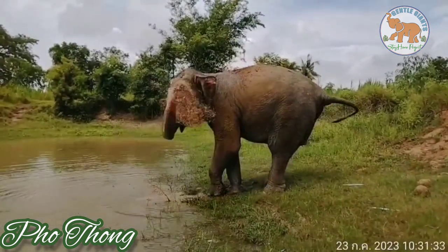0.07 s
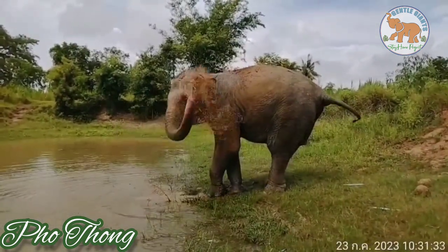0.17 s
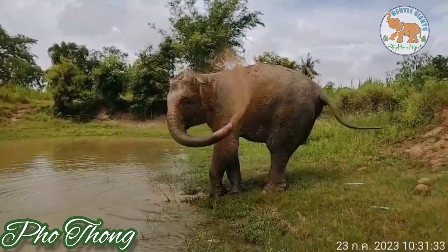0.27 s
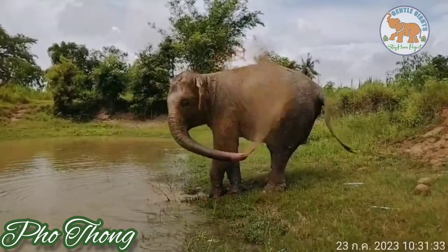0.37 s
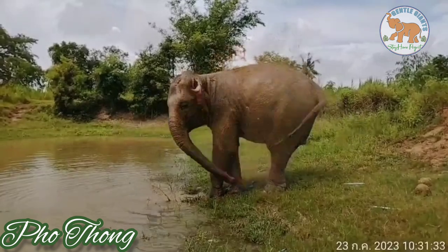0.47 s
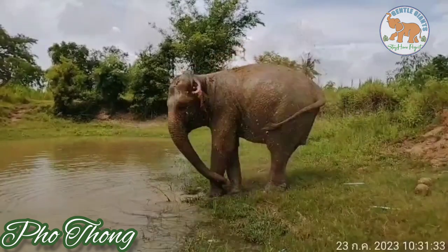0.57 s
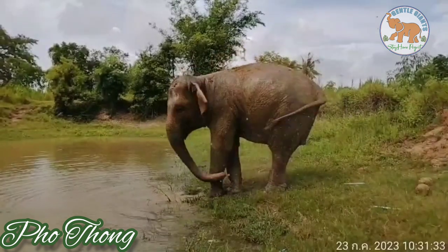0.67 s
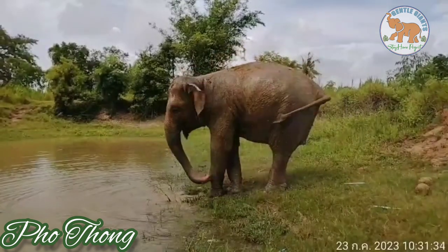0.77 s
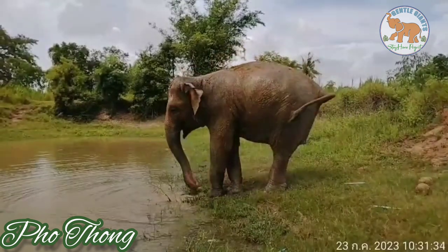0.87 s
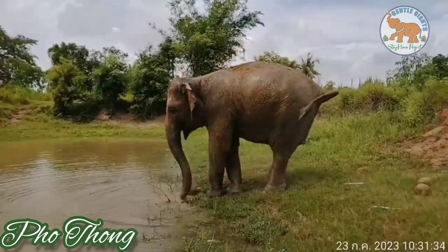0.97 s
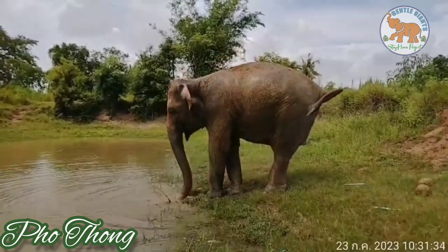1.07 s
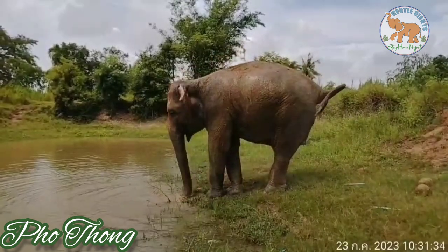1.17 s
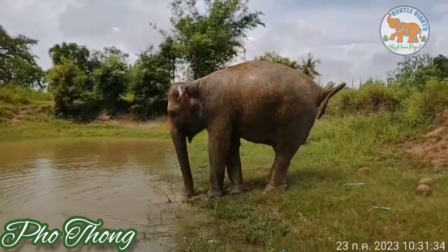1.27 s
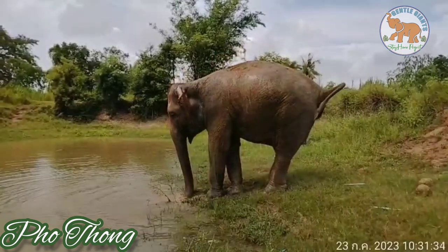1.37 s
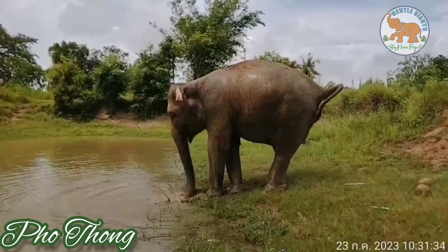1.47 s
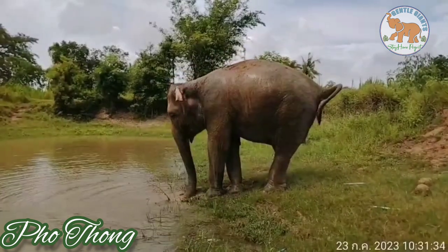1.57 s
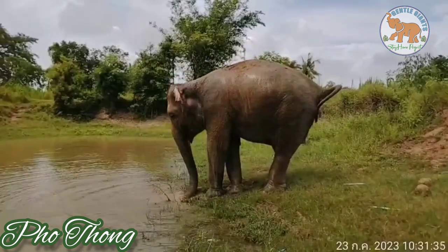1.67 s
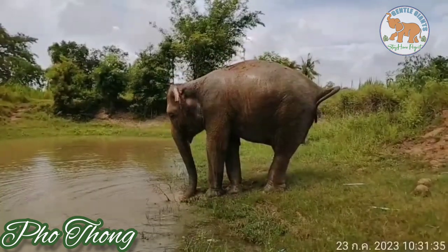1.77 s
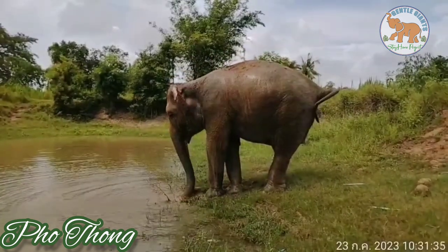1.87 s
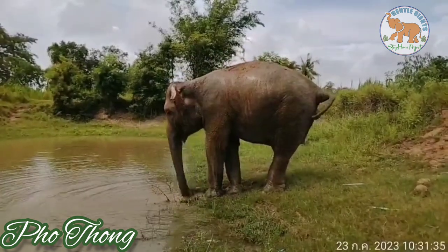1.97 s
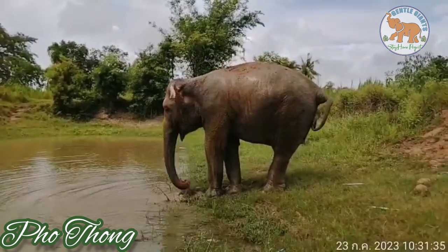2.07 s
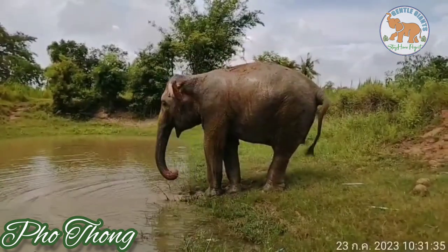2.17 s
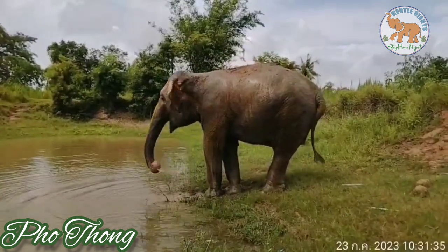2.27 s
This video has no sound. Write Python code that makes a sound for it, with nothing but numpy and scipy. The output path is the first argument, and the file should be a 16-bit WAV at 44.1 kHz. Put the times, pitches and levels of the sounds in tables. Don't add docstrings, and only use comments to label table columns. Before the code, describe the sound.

A trunkful of water sloshes and sprays brightly, slaps an elephant's flank, patters on hide and grass, then dribbles out and stirs slightly; quiet open pond edge, distant bird, light breeze on the microphone.

```python
import sys
import numpy as np
from scipy import signal
from scipy.fft import rfft, irfft
from scipy.io import wavfile

SR = 44100
rng = np.random.default_rng(int(sys.argv[2]) if len(sys.argv) > 2 else 0)


def boost_factor(decibels):
    exponent = np.asarray(decibels, float) / 20
    return 10 ** exponent


def transcribe(signal):
    frames = np.atleast_2d(signal).T
    limited = np.clip(frames, -1, 1)
    pcm = np.round(limited * 32767).astype(np.int16)
    wavfile.write(sys.argv[1], SR, pcm)


N = 101430


def rms_one(x):
    return x / np.sqrt(np.mean(x ** 2) + 1e-20)


def in_time(rows):
    s, *columns = np.transpose(rows)
    return [np.interp(np.arange(N) / SR, s, c) for c in columns]


def drift(rate):
    r = np.exp(-40 * np.pi * rate / SR)
    slow = signal.lfilter([1], [1, -2 * r, r * r], rng.standard_normal(N // 20 + 2002))
    slow = rms_one(slow[2000:])
    return np.interp(np.arange(N) / 20, np.arange(len(slow)), slow)


def band(x, low_hz, high_hz):
    return signal.sosfilt(signal.butter(2, [low_hz, high_hz], "band", fs=SR, output="sos"), x)


def ring(clicks, hz, t60_s):
    r = boost_factor(-60 / (t60_s * SR))
    w = 2 * np.pi * hz / SR
    return signal.lfilter([0, np.sin(w)], [1, -2 * r * np.cos(w), r * r], clicks + 1e-18)


def coloured(excite, spectrum, patchy_db):
    hz, db = np.transpose(spectrum)
    edges_hz = 100 * 2 ** np.arange(0, 7.5, 1 / 5)
    out, shared = 0, drift(8.0)
    for k, (low_hz, high_hz) in enumerate(zip(edges_hz, edges_hz[1:])):
        centre_hz = np.sqrt(low_hz * high_hz)
        if hz[0] / 1.2 < centre_hz < hz[-1] * 1.2:
            level_db = np.interp(np.log(centre_hz), np.log(hz), db)
            flicker_db = patchy_db * (.3 * shared + drift(22))
            out = out + band(excite[k % 2], low_hz, high_hz) * boost_factor(level_db + flicker_db)
    return out / np.sqrt(np.mean(out[0] ** 2))


def open_air():
    # frequency in Hz, level in dB per Hz.
    air = [(120, 6), (300, 0), (1000, -49.5), (2200, 2), (3800, -13), (5500, 11.5), (8000, -3), (14000, 0)]
    return boost_factor(-76) * coloured(rng.standard_normal((2, 2, N)), air, patchy_db=1.0)


def breeze():
    # time in seconds, level in dB.
    gusts = [(0.0, -70), (0.15, -73.5), (0.23, -59), (0.31, -61), (0.35, -55), (0.38, -62), (0.61, -65),
             (0.645, -53), (0.71, -68), (0.8, -65), (0.92, -70), (1.13, -64), (1.22, -71), (1.27, -63),
             (1.31, -70), (1.36, -64), (1.65, -77.5), (2.3, -77)]
    level_db, = in_time(gusts)
    rumble = rms_one(band(rng.standard_normal(N), 20.5, 85))
    return boost_factor(level_db + 1.3 * drift(5.6)) * rumble


def bird():
    # start in seconds, length in seconds, start pitch in Hz, end pitch in Hz, level in dB.
    notes_sung = [
        (.605, .13, 1320, 1360, -65),
        (.72, .085, 1290, 1310, -66),
        (.85, .05, 1205, 1215, -75),
        (1.06, .06, 1260, 1410, -63),
        (1.15, .08, 1200, 1240, -64),
        (1.22, .05, 1280, 1310, -63),
        (1.28, .06, 1300, 1340, -69),
    ]
    out, t = np.zeros(N), np.arange(N) / SR
    for start_s, length_s, from_hz, to_hz, db in notes_sung:
        u = np.clip((t - start_s) / length_s, 0, 1)
        phase = 2 * np.pi * np.cumsum(from_hz + (to_hz - from_hz) * u) / SR
        out += boost_factor(db + 2.5) * np.sin(np.pi * u) ** .5 * np.sin(phase)
    return out * boost_factor(2.0 * drift(45))


def pop():
    pop_s, swing_hz, t60_s = 2.0542, 615, 0.0041
    click = 1. * (np.arange(N) == int(pop_s * SR))
    w = 2 * np.pi * swing_hz / SR
    r = boost_factor(-60 / (t60_s * SR))
    swing = signal.lfilter([1, -r * np.cos(w)], [1, -2 * r * np.cos(w), r * r], click + 1e-18)
    return boost_factor(-27.5) * swing + boost_factor(-22) * band(click, 3400, 14500)


def thump():
    land_s, swell_s, low_hz, rise = .6445, .0095, 100, .15
    u = np.maximum(np.arange(N) / SR - land_s, 0) / swell_s
    hz = low_hz * (1 + rise * (1 - np.exp(-u))) * (u > 0)
    return boost_factor(-37) * u * np.exp(1 - u) * np.sin(2 * np.pi * np.cumsum(hz) / SR)


def splats():
    # time in seconds, peak in dB, first ring in Hz, second ring (higher or lower) in Hz, second ring
    # level re the first in dB.
    lumps = [(0.6455, -39.5, 990, 700, -6), (.664, -46, 474, 2320, 11.5), (1.124, -43.5, 690, 1600, 4),
             (1.127, -41.5, 1170, 190, -4.5), (1.24, -43, 300, 1297, -3), (1.239, -44.5, 1586, 1070, -4.5),
             (1.304, -54, 550, 1050, -2), (1.402, -57, 610, 2950, 1), (1.4, -68, 1040, 960, -18),
             (2.194, -60, 1150, 4010, 8), (1.705, -69, 460, 240, -1.5), (1.727, -63.5, 660, 3150, 14),
             (1.998, -62, 860, 1630, 7.5), (.964, -54.5, 2180, 270, -2.5), (.976, -59, 1160, 1110, -20),
             (2.283, -69, 700, 1130, 8.5), (2.2415, -67, 285, 1120, 0), (.598, -50, 200, 280, -3),
             (.669, -48, 270, 180, 0), (.455, -52, 170, 260, -2)]
    ring_s, ring_cycles, crack_db = 0.021, 5.1, 0.5
    out, t = np.zeros(N + SR), np.arange(8000) / SR
    noise = rng.standard_normal((len(lumps), 8000))
    for (s, db, low_hz, high_hz, upper_db), n in zip(lumps, noise):
        hit = 1. * (t == 0) + 0.091 * n * np.exp(-t / 0.0014)
        low = ring(hit, low_hz, ring_s + ring_cycles / low_hz)
        upper = boost_factor(upper_db) * ring(hit, high_hz, ring_s + ring_cycles / high_hz)
        crack = boost_factor(crack_db) * band(n * np.exp(-t / 0.0069), 210, 3600)
        i = int(s * SR)
        out[i:i + len(t)] += boost_factor(db) * (low + upper + crack)
    return band(out[:N], 140, 9000)


def drops():
    # time in seconds, bright peak in dB, dull peak (near 4 kHz) in dB, length in ms.
    impacts = [(.604, -35, -45, 1.3), (0.654, -46, -31.5, 2.8), (0.663, -37, -32.5, 2.5),
               (.8455, -31.5, -54, 1.5), (.896, -40.5, -62, 5.5), (0.92, -42, -45, 3.7),
               (.962, -33, -71, 3.9), (0.97, -33, -68, 2.5), (1.024, -42, -43.5, 3.2),
               (1.0328, -38, -52, 4.6), (1.047, -42, -45, 1.8), (1.054, -38, -57, 1.4),
               (1.07, -43, -48.5, 0.97), (1.09, -40, -53, 2), (1.107, -33.5, -40, 5.2),
               (1.115, -24.5, -28.5, 1.24), (1.133, -31.5, -49, 2.4), (1.165, -36, -48, 3.7),
               (1.18, -41, -42, 2), (1.223, -39, -38, 2.3), (1.241, -44, -45, 8.7), (1.256, -42, -43, 3),
               (1.2852, -36.5, -56, 3), (1.3, -41, -53, 3.3), (1.3327, -39, -44.5, 3.3),
               (1.478, -54, -53, 4.5), (1.6577, -52.5, -54.5, 4.7), (1.726, -45.5, -56, 5.5),
               (1.973, -65, -58.5, 3.7), (1.996, -55.5, -53, 12), (.0987, -36, -55, 2.2),
               (.1216, -46, -45, 4.6), (.2229, -40, -49, 5), (.276, -25, -33, 3.2), (.56, -34, -52, 4.6),
               (0.646, -41, -36, 4), (.811, -42, -60, 1.5), (.8814, -41, -59, 3.6), (1.124, -31, -48, 2),
               (1.147, -40, -55, 2), (1.3878, -47, -61, 2), (1.434, -52, -57, 2.2), (1.5562, -56, -79, 2.5),
               (1.5851, -58, -75, 2.5), (1.6233, -57, -61, 3), (1.7772, -60, -77, 2.5),
               (1.9064, -60, -67, 3.5), (1.9373, -62, -70, 3), (2.236, -62, -62, 2), (2.15, -62, -58, 9),
               (2.172, -56, -57, 9), (2.257, -68, -62, 5)]
    attack_s = 0.00088
    out, t = np.zeros((2, N + SR)), np.arange(1500) / SR
    noise = rng.standard_normal((len(impacts), 2, 2, 1500))
    for (s, bright_db, dull_db, ms), (a, b) in zip(impacts, noise):
        shape = np.minimum(t / attack_s, 1) * np.exp(-1000 * t / ms)
        bright = boost_factor(bright_db + 1.5) * band(a * shape, 7030, 13700)
        dull = boost_factor(dull_db + 6) * band(b * shape, 2950, 4800)
        i = int(s * SR)
        out[:, i:i + len(t)] += bright + dull
    return out[:, :N]


def droplets():
    rate_per_s, spread_db, grain_s, share = 500, 3, 0.0028, 0.32
    hits = (rng.random(N) < rate_per_s / SR) * boost_factor(spread_db * np.minimum(rng.exponential(1, N), 4))
    r = np.exp(-1 / (grain_s * SR))
    gate = 1 - share + share * rms_one(signal.lfilter([1], [1, -r], hits + 1e-18))
    return rng.standard_normal((2, 2, N)) * gate


def bubbles():
    rate_per_s, cycles = 600, 26
    sizes = boost_factor(3.4 * np.minimum(rng.exponential(1, N), 3)) * (rng.random(N) < rate_per_s / SR)
    dealt = rng.integers(0, 30, N)
    out = np.zeros(N)
    for k, hz in enumerate(np.geomspace(520, 4600, num=30)):
        out += ring(sizes * (dealt == k), hz, cycles / hz)
    return rms_one(out)


def spray():
    # time in seconds, hiss in dB, finest mist re hiss in dB, patter on grass re hiss in dB.
    flow = [(0, -55.5, -6, -17), (.24, -45.5, -6.5, -18), (.258, -30, -4, -22), (.3, -31.5, 1, -21),
            (.315, -35.5, -3, -20), (.45, -41.5, -6, -20), (.605, -42, -2.5, -9), (.615, -36, -5, -17),
            (.65, -38, -10, -18), (.715, -53, -4, -11), (1.09, -53.5, 0, -5), (1.11, -42.5, -12, -7),
            (1.2, -52.5, -8, -8.5), (1.34, -58, -8, -12), (1.95, -80.5, -7, -14), (2.04, -66.5, -5, -9),
            (2.18, -52.5, -8, -15), (2.3, -69.5, -9, -10)]
    # time in seconds, level in dB.
    gush = [(0, -56), (.08, -48), (.11, -50), (.14, -57), (.17, -46.5), (.52, -49), (.6, -58.5),
            (.65, -45.5), (.72, -63), (.95, -70), (1.12, -58), (1.2, -60.5), (1.3, -61.5), (1.45, -77),
            (1.97, -85.5), (2.0, -71), (2.1, -73), (2.2, -68.5)]
    # frequency in Hz, level in dB per Hz.
    fine = [(2200, -23.5), (3000, -11.5), (4100, -9.5), (5600, -12), (6600, -5.5), (7900, -11.5),
            (9500, -2), (14500, -15.5)]
    slosh = [(140, -3.5), (330, -5.5), (600, 1), (820, -10), (1120, 1), (2100, -3.5), (3800, -4.5),
             (5500, -12.5)]
    flicker_db = 3.5
    hiss_db, mist_db, patter_db = in_time(flow)
    body_db, = in_time(gush)
    hiss = coloured(droplets(), fine, patchy_db=2.4)
    mist = band(droplets()[0], 9380, 14000) * boost_factor(flicker_db * drift(14.6))
    patter = band(droplets()[0], 8100 - 1040, 8100 + 1040)
    body = coloured(droplets(), slosh, patchy_db=2.6)
    body = body + boost_factor(-3.5) * bubbles() * [[1], [0]]
    out = boost_factor(hiss_db - 3.5) * hiss + boost_factor(body_db - 2.0) * body
    out = out + boost_factor(hiss_db + mist_db - 0.5) * rms_one(mist)
    return out + boost_factor(hiss_db + patter_db + flicker_db * drift(18.5)) * rms_one(patter)


def ports(side):
    # frequency in Hz, share of patches in which the ports disagree (0-1).
    apart = [(4500, 0), (4700, .4), (5700, .5), (6900, .8), (9000, .95), (11500, .92), (13000, .78),
             (14500, .3)]
    patch_hz, patch_frames, side_db = 750, 2, -3.8
    hz, t, z = signal.stft(side, SR, nperseg=2048)
    draw = rng.random((40, len(t) // patch_frames + 22))
    row = (hz // patch_hz).astype(int)
    column = (np.arange(len(t)) + row[:, None]) // patch_frames
    share = np.interp((row + .5) * patch_hz, *np.transpose(apart))
    differs = draw[row[:, None], column] < share[:, None]
    return boost_factor(side_db) * signal.istft(z * differs, SR, nperseg=2048)[1][:N]


def scene():
    mid, side = open_air() + drops() + spray()
    mid = mid + breeze() + bird() + pop() + thump() + splats()
    side = ports(side)
    return np.array([mid + side, mid - side])


def band_limit(x):
    return signal.sosfilt(signal.butter(12, 14770, fs=SR, output="sos"), x)


def record(dry):
    # centre in Hz, width in Hz, level in dB.
    resonances = [(3900, 500, 4), (5700, 500, -4), (8000, 550, 6.5), (9600, 600, -2), (12000, 800, 2)]
    hz = np.arange(N // 2 + 1) * SR / N
    colour_db = np.zeros(len(hz))
    for centre_hz, width_hz, db in resonances:
        colour_db += db * np.exp(-.5 * ((hz - centre_hz) / width_hz) ** 2)
    heard = irfft(rfft(dry) * boost_factor(colour_db), N)
    top_cut = signal.ellip(12, .5, 70, 14250, fs=SR, output="sos")
    return band_limit(signal.sosfilt(top_cut, heard))


dry = scene()
out = record(dry)
transcribe(out)
```